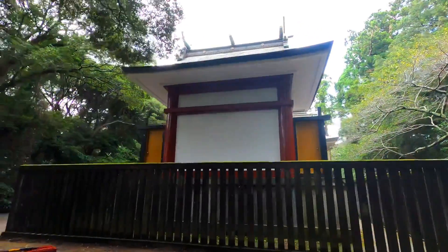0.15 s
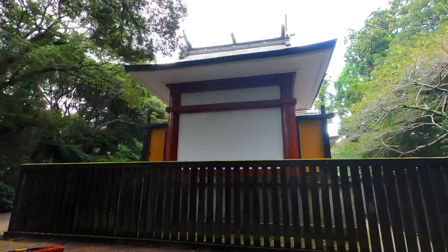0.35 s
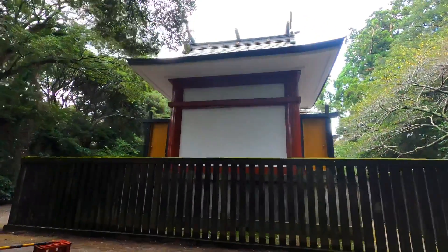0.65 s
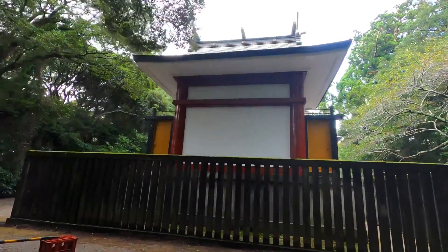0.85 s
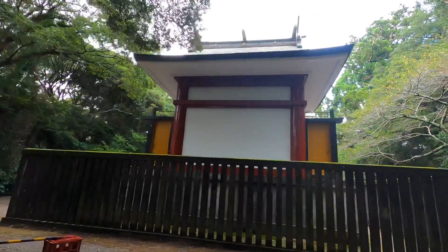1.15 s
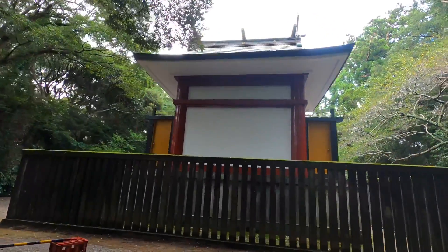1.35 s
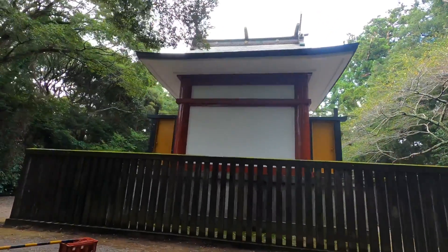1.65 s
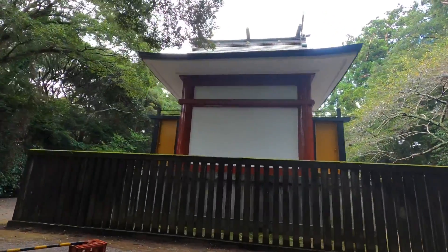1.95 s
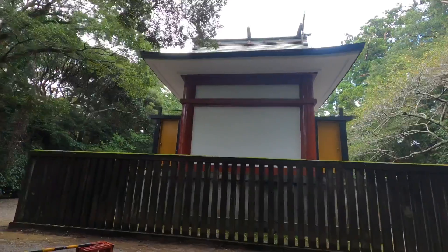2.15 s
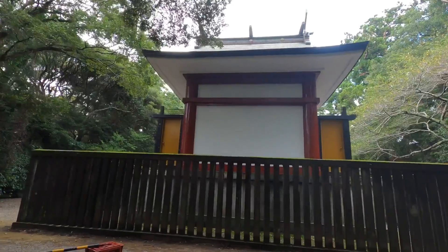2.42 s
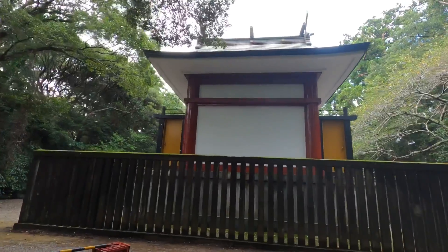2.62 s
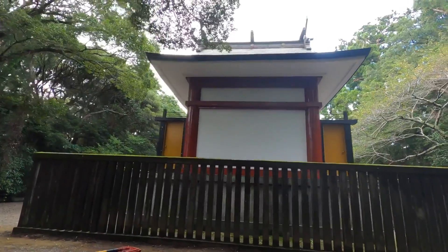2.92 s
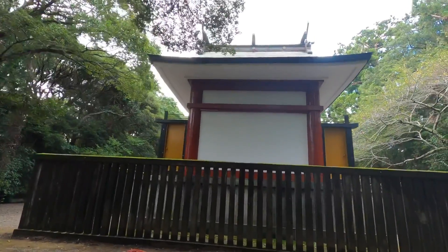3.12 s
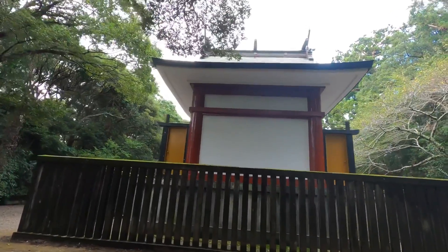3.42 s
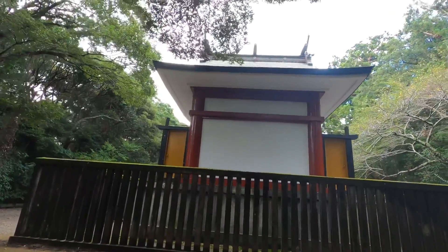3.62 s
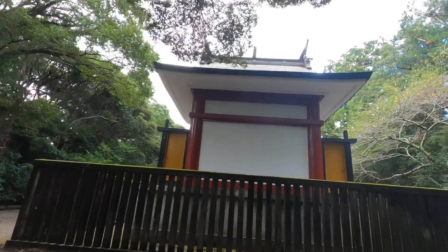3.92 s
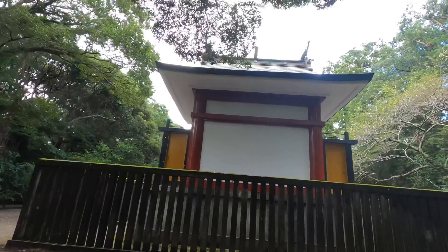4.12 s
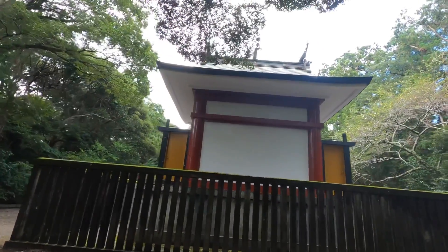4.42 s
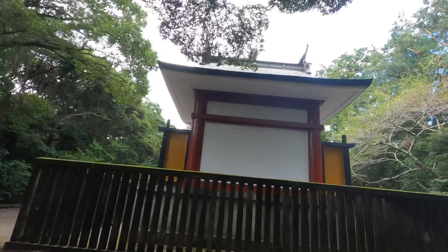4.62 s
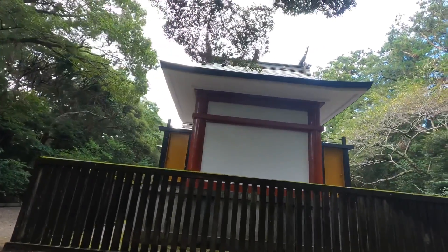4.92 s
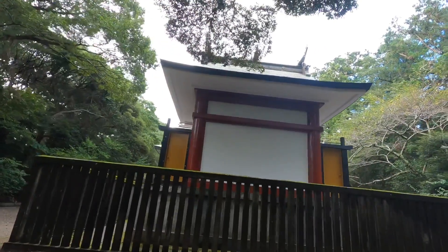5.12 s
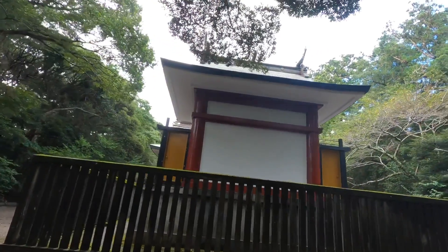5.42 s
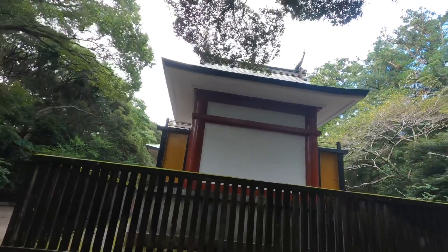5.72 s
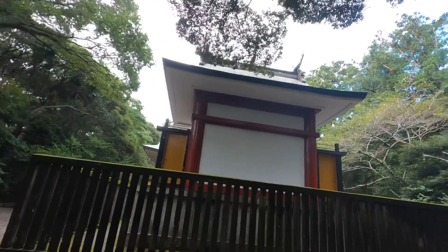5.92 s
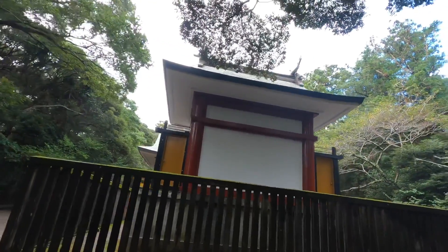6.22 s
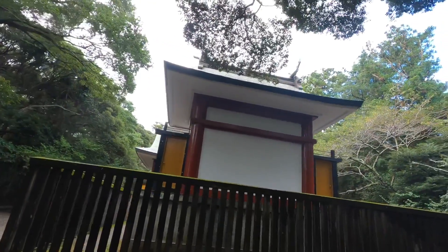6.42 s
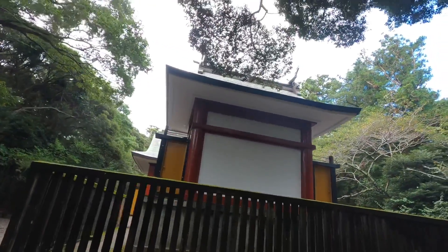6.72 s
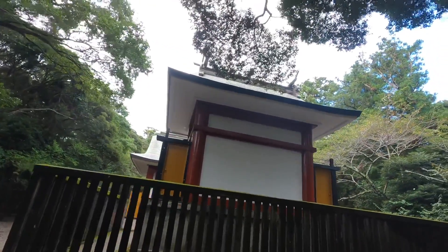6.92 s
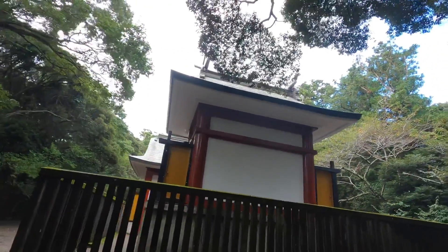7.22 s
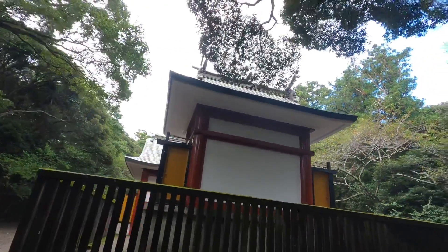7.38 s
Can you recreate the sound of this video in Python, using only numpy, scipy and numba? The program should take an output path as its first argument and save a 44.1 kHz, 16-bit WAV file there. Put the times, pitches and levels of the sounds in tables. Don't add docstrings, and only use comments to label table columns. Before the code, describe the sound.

Slow, regular steps grind and snap on gravel beside a wooden fence in a wooded shrine ground. A near cicada sings rising whoops that end in a quick upward leap, with bright high buzzes between them. Faint whistling cicadas and a flickering insect chorus fill the trees. The handheld microphone sways with deep rumble, and a few dull grip knocks come near the middle and later.

```python
import sys
import numpy as np
from scipy import signal
from scipy.fft import rfft, irfft, next_fast_len
from scipy.io import wavfile
from scipy.ndimage import uniform_filter1d
from numba import njit

SR = 44100
rng = np.random.default_rng(int(sys.argv[2]) if len(sys.argv) > 2 else 0)


def rack_gain(trim_db):
    fader = np.asarray(trim_db, float)
    return 10 ** (fader / 20)


def pcm_store(signal):
    levels = np.round(np.clip(np.atleast_2d(signal), -1, 1) * 32767)
    wavfile.write(sys.argv[1], SR, levels.astype(np.int16).T)


N = 332955
T = np.arange(N) / SR

# (frequency [Hz], level [dB per Hz])
AIR_SPECTRUM = [(24, -29.5), (40, -7.5), (52, -24.5), (70, -22), (80, -19.5), (283, -29), (496, -35.5),
                (793, -40), (1120, -30), (1500, -58), (1950, -64), (3300, -120)]
AIR_DB = -61
HUM_DB, HUM_FADES_DB_S, HUM_WAVER_DB = -72, -0.95, 3

# (time [s], hold [s], level [dB], fade [s per 20 dB]); fade < 0 stays on
TREMORS = [(0, .01, -34.5, 0.8), (0.446, 0.079, -29, 1.7), (1.16, 0.33, -31.5, 0.6),
           (2.077, 0.017, -29, 1.3), (2.94, 0.09, -30, 0.8), (3.663, 0.067, -32.5, 0.1),
           (4.155, 0.071, -36, 2.2), (4.54, 0.095, -38.5, 0.1), (4.77, 0.018, -38, -2.5),
           (5.227, 0.024, -29.5, 0.24), (5.85, 0.35, -34.5, 0.3), (6.68, 0.24, -30, -1.8),
           (7.48, 0.045, -30, -7)]
# (time [s], hold [s], level [dB])
JOLTS = [(0, .01, -52), (0.167, .01, -51), (.34, .05, -32), (1.027, 0.018, -34.5), (1.28, .01, -43.5),
         (1.988, .01, -34), (2.5, 0.12, -43), (2.797, 0.41, -32.5), (3.25, 0.26, -37.5), (3.82, .03, -34),
         (4.25, 0.11, -46), (4.51, .01, -30), (4.71, .01, -39), (4.966, .02, -36.5), (5.367, 0.011, -33),
         (5.66, .01, -29.5), (6.356, .02, -41), (7.36, .01, -46.5), (7.54, .01, -41)]
TREMOR_RISE_S, JOLT_RISE_S, JOLT_FADE_S = 0.31, .25, 0.13
STILL_TREMOR_DB = -53.5
ARM_HZ = 36

# (time [s], level [dB])
CHORUS_LEVEL = [(0, -62.5), (.4, -59), (1.14, -61.5), (3.09, -60), (4.25, -60), (4.58, -59), (5.38, -58.5),
                (6.08, -62), (6.5, -58.5), (7.55, -60)]
# (frequency [Hz], level [dB per Hz])
LOW_THRONG = [(760, 0), (1300, -15), (1430, -6), (2190, 1.5), (3230, -0.5), (3650, 2.5), (4420, -6),
              (5200, -16), (6760, -8), (11400, -120)]
HIGH_THRONG = [(2820, -16), (4800, -2.5), (5160, -1.5), (6750, 0), (10900, -11.5), (12500, -8.5),
               (16200, -40), (22000, -120)]
SWELL_DB, SWELL_RISE_S, SWELL_FADE_S = -60, 1.1, 0.57
HIGH_DB, HIGH_SHARE, HIGH_GROWS_DB_S = -67.5, 0.35, 0.3
# (time [s], hold [s], level [dB], rise [s per 20 dB], fade [s per 20 dB])
BUZZES = [(.57, 0.12, -66.5, .35, 0), (.865, .18, -62.5, .05, 0.19), (1.47, .25, -67.5, .25, .25),
          (2.23, 0.13, -63, .11, 0.41), (2.64, .02, -66, .8, .3), (3.07, .05, -66, .35, 1),
          (3.53, .17, -61.5, .09, 0.36), (3.8, .05, -65.5, .3, 1.2), (4.14, .09, -66, .08, .7),
          (4.81, 0.11, -61, .13, 0.23), (5.57, .3, -65.5, 1.2, .3), (5.99, 0.13, -61.5, .15, 0.1),
          (7.17, .12, -60.5, .11, .25), (7.46, .04, -66, .3, .4)]
# (time [s], level [dB])
FAR_BUZZ = [(0, -69), (.8, -74.5), (2.1, -75), (3.4, -71), (4.6, -68.5), (5.4, -66.5), (6.9, -66),
            (7.12, -72), (7.55, -70)]
# (frequency [Hz], level [dB per Hz])
BUZZ_SPECTRUM = [(7000, -33), (9000, -15.5), (11200, -17), (12500, -12), (13500, -6.5), (14600, -6),
                 (15700, -10)]

# (time [s], peak level [dB], ring [Hz], sharp edge [dB])
STONES = [(0.109, -48, 1120, -4), (0.219, -65, 1080, -15), (0.429, -43.5, 990, -12), (0.467, -54, 810, -9),
          (1.091, -48, 875, -8), (1.182, -52, 890, -14), (1.992, -54, 880, -12), (2.755, -51, 1050, -19),
          (2.883, -36.5, 1170, -28), (3.693, -48, 1020, -0.5), (3.734, -53, 970, -17),
          (4.277, -48, 1080, -15), (4.302, -43, 1110, -15), (4.333, -50, 1110, -14), (4.457, -54, 920, -15),
          (5.25, -59, 1170, -18), (5.295, -47, 1110, -12), (5.883, -48, 1170, -10), (5.907, -48, 920, -5),
          (5.962, -41.5, 830, -17.5), (5.963, -43, 1050, -14), (5.982, -42.5, 1050, -12),
          (6.599, -45, 970, -12), (6.74, -52, 1250, -12), (6.854, -58, 950, -16), (7.389, -49, 832, -16),
          (7.413, -41, 1094, -18), (7.422, -43, 1130, -19), (7.461, -53, 815, -8)]
# (frequency [Hz], width [Hz], level [dB])
GRAVEL_MODES = [(568, 360, -3), (677, 340, -2.5), (950, 600, 5.5), (1170, 62, -1.5), (2220, 5300, -25)]
# (heel time [s], heel level [dB], roll to the ball of the foot [s], ball level [dB])
STEPS = [(.31, -61.5, 0.1, -57.5), (1.11, -59.5, 0.092, -59), (1.9, -66, 0.1, -54.5),
         (2.78, -57.5, 0.069, -59), (3.64, -58.5, .1, -63), (4.29, -58, .17, -54),
         (5.19, -59.5, 0.068, -56), (5.87, -62, 0.093, -52.5), (6.6, -58, 0.17, -56.5),
         (7.34, -58.5, 0.073, -55)]
# (time [s], level [dB])
SCUFFS = [(.12, -66), (1.45, -61), (1.66, -73), (3.51, -62), (4.63, -64), (5.11, -57.5), (5.53, -60),
          (6.88, -58.5), (2.92, -62), (4.52, -60), (7.5, -62)]
HEEL_RISE_S, HEEL_FADE_S, BALL_RISE_S, BALL_FADE_S, SCUFF_S = 0.17, 0.62, 0.046, 0.048, 0.06
PUSH_OFF_S, PUSH_OFF_DB, PUSH_FADE_S = 0.054, -7.5, 0.19
SETTLING_DB, SLIP_DB = -65, 1.5

# (end time [s], level [dB], time stretch [factor], pitch [factor], second resonance [dB])
WHOOPS = [(.49, -63, 1.05, 1.07, 3), (0.826, -54, 0.94, 1.01, 3), (1.52, -62, 0.85, 1.08, -2),
          (2.168, -54, 1.03, 1.0, 3.5), (3.486, -54, 0.83, 0.99, 4), (4.45, -62, 0.8, 1.18, -4),
          (4.748, -53.5, .7, 1.01, -0.5), (5.925, -54.5, 0.83, 1.005, 3.5), (6.4, -60.5, 0.72, 1.01, -12),
          (7.112, -55, 0.85, .97, 4)]
# (rest [Hz], slow climb [Hz], final leap [Hz], level [dB], change in the leap [dB])
ABDOMEN_MODES = [
    (1450, 450, 1230, -2.5, 0.5),
    (2900, 720, 1000, 0.5, -11),
    (5900, 800, 800, -15.5, 4),
]
# (time from the end [s], level [dB])
EFFORT = [(-.3, -25), (-.2, -14), (-.13, -7), (-.08, -2.5), (-.03, 2.5)]
WHOOP_S, LEAP_S, CUT_S, CLIMB_CURVE = .3, .036, .004, 1.1
TOP_EFFORT_SHARE, LEAD_DB, CUT_DB = 0.37, 9, -20

# (start [s], end [s], start pitch [Hz], end pitch [Hz], level [dB])
WHISTLES = [(.83, .99, 3860, 3950, -67.5), (.99, 1.035, 3960, 4000, -58.5),
            (1.763, 1.785, 2730, 2800, -62.5), (2.25, 2.39, 3850, 4070, -63),
            (2.458, 2.49, 2080, 2100, -64), (3.59, 3.63, 4500, 4370, -65), (4.782, 4.93, 3680, 3820, -69),
            (4.92, 5.12, 2510, 2620, -65), (5.12, 5.237, 2650, 3320, -65), (5.349, 5.41, 3750, 4580, -61),
            (5.37, 5.46, 1950, 2610, -65), (6.06, 6.098, 3730, 3700, -58), (6.28, 6.38, 3550, 4200, -62.5),
            (7.18, 7.21, 4420, 4460, -65), (7.22, 7.33, 3680, 4380, -58), (7.23, 7.37, 2500, 2870, -59)]

# (time [s], peak level [dB], pitch [Hz])
KNOCKS = [(3.052, -32, 115), (3.08, -40.5, 118), (3.126, -38.5, 107), (3.17, -39, 116), (3.2, -41, 115),
          (5.246, -33.5, 116.6)]
TOP_HZ = 15740


def unit(x):
    return x / np.sqrt(np.mean(x ** 2))


def curves(table):
    s, *columns = np.transpose(table)
    return [np.interp(T, s, c) for c in columns]


def colour(points, source=None):
    hz, db = np.transpose(points)
    bins_hz = np.maximum(np.arange(N // 2 + 1) * SR / N, 1e-3)
    gain = rack_gain(np.interp(np.log(bins_hz), np.log(hz), db, left=-120, right=-120))
    if source is None:
        source = rng.standard_normal(N)
    return unit(irfft(rfft(source) * gain, N))


@njit
def svf(x, hz, width, rate):
    y, band, low = np.empty(len(x)), 0., 0.
    for i in range(len(x)):
        g = np.tan(np.pi * hz[i] / rate)
        k = width / hz[i]
        v = (band + g * (x[i] - low)) / (1 + g * (g + k))
        low += 2 * g * v
        band = 2 * v - band
        y[i] = k * v
    return y


def ring(x, hz, width_hz):
    return svf(x, hz + np.zeros(len(x)), 1. * width_hz, 1. * SR)


def walk(rate):
    k = int(SR / rate)
    held = np.repeat(rng.standard_normal(N // 200)[:N // k + 1], k)
    return unit(uniform_filter1d(uniform_filter1d(held, k), k)[:N])


def bursts(start, hold, db, rise, fade):
    t = T[::64, None]
    below = np.maximum(np.maximum((start - t) / rise, (t - start - hold) / fade), 0)
    power = np.sum(rack_gain(db - 20 * below) ** 2, axis=1)
    return np.interp(T, t[:, 0], np.sqrt(power))


def tymbal(click_hz, rough, depth):
    phase = np.cumsum(click_hz * (1 + rough * walk(60))) / SR % 1
    pulse = np.exp(-phase / 0.9)
    return unit(rng.standard_normal(N) * (1 - depth + depth * pulse))


def warble(hz, drift, flutter_db):
    phase = 2 * np.pi * np.cumsum(hz * (1 + drift)) / SR
    return np.sqrt(2) * np.sin(phase) * rack_gain(flutter_db)


def far_air():
    air = colour(AIR_SPECTRUM) * rack_gain(AIR_DB + 2.5 + 1.35 * walk(4.94))
    hum = colour([(240, -35.0), (265, 1.5), (285, 4.0), (310, -21)])
    return air + hum * rack_gain(HUM_DB + HUM_FADES_DB_S * T + HUM_WAVER_DB * walk(7))


def steady(x):
    return unit(x / (.15 + np.abs(signal.hilbert(x, next_fast_len(N))[:N])))


def hand_sway():
    start, hold, db, fade = np.transpose(TREMORS)
    swing = bursts(start, hold, db, TREMOR_RISE_S, fade) + rack_gain(STILL_TREMOR_DB)
    jolt = bursts(*np.transpose(JOLTS), JOLT_RISE_S, JOLT_FADE_S)
    tremor = colour([(10, -14.5), (12.5, -6.0), (15, -3.0), (17.5, -15.0), (20, -32.0)])
    shake = colour([(19, -5), (24, 0.0), (29, -0.5), (32.5, -2), (35, -11.5), (39, -22.5), (48, -28)])
    drift = rack_gain(-40.5) * colour([(.6, -4.0), (4, -2.5), (9, 5.0), (11, -2.0)])
    sway = steady(tremor) * swing + steady(shake) * (jolt * rack_gain(-9.5) + rack_gain(-53.5)) + drift
    sway *= 1 - np.exp(-(T / .03) ** 2)
    return signal.sosfilt(signal.butter(6, ARM_HZ, fs=SR, output="sos"), sway)


def patchy(low_hz, high_hz, flicker_db, count):
    centres = np.geomspace(low_hz, high_hz, count)
    return sum(ring(rng.standard_normal(N), hz, hz / 9) * rack_gain(flicker_db * walk(22)) for hz in centres)


def throngs():
    end, db = np.transpose(WHOOPS)[:2]
    swell = bursts(end, 0, SWELL_DB + db - db.max(), SWELL_RISE_S, SWELL_FADE_S)
    level = np.hypot(rack_gain(curves(CHORUS_LEVEL)[0]), swell)
    low = colour(LOW_THRONG, patchy(1200, 5500, flicker_db=2.2, count=18))
    low = low * level * rack_gain(.7 + .5 * walk(14))
    high = colour(HIGH_THRONG, patchy(4480, 12950, flicker_db=1.45, count=12))
    high = high * rack_gain(HIGH_DB + HIGH_GROWS_DB_S * T + 0.23 * walk(11.0))
    high = high * (level / level.mean()) ** HIGH_SHARE
    hiss = rack_gain(-81.5) * colour([(9000, -11), (12000, -19), (16000, -9)])
    return low + high + hiss


def high_buzz():
    buzz = colour(BUZZ_SPECTRUM, tymbal(click_hz=144, rough=0.07, depth=0.31)) * rack_gain(-2.0)
    return buzz * np.hypot(bursts(*np.transpose(BUZZES)), rack_gain(curves(FAR_BUZZ)[0]))


def grains(per_s, spread_db):
    hit = rng.random(N) < per_s / SR
    size_db = spread_db * np.minimum(rng.exponential(size=N), 3)
    return unit(hit * rng.choice([-1, 1], N) * rack_gain(size_db))


def gravel_bed(x):
    return sum(rack_gain(db) * ring(ring(x, hz, width), hz, 1.8 * width) for hz, width, db in GRAVEL_MODES)


def tread():
    heel, heel_db, roll, ball_db = np.transpose(STEPS)
    scuff, scuff_db = np.transpose(SCUFFS)
    ball = heel + roll
    parts = [bursts(heel, 0, heel_db, HEEL_RISE_S, HEEL_FADE_S),
             bursts(ball, 0, ball_db, BALL_RISE_S, BALL_FADE_S),
             bursts(ball + PUSH_OFF_S, 0, ball_db + PUSH_OFF_DB, BALL_RISE_S, PUSH_FADE_S),
             bursts(scuff, 0, scuff_db, SCUFF_S, SCUFF_S),
             rack_gain(SETTLING_DB)]
    return np.sqrt(sum(p ** 2 for p in parts)) * rack_gain(SLIP_DB * walk(25))


def footsteps():
    crunch = unit(gravel_bed(grains(per_s=1100, spread_db=1.5))) * tread() * rack_gain(-1.26)
    t = T[:SR // 30]
    for s, db, hz, edge_db in STONES:
        i = int(s * SR)
        snap = np.sin(2 * np.pi * hz * t) * (t / 0.0019) * np.exp(1 - t / 0.0022)
        hiss = ring(rng.standard_normal(len(t)), 4000, 2000)
        edge = 2.9 * hiss * (t / 0.0014) * np.exp(1 - t / 0.0011)
        crunch[i:i + len(t)] += rack_gain(db - 4.5) * (snap + rack_gain(edge_db) * edge)[:N - i]
    return crunch


def abdomen(s):
    climb = np.clip(1 + s / WHOOP_S, 0, 1) ** CLIMB_CURVE
    leap = np.clip(1 + (s - CUT_S / 2) / LEAP_S, 0, 1) ** 1.3
    effort_db = np.interp(s, *np.transpose(EFFORT))
    cut_db = CUT_DB * np.clip(s / CUT_S + .25, 0, 1)
    pitches = [hz + up * climb + jump * leap for hz, up, jump, _, _ in ABDOMEN_MODES]
    levels = [db + share * effort_db + jump_db * np.sqrt(leap) + cut_db
              for share, (*_, db, jump_db) in zip((1, 1, TOP_EFFORT_SHARE), ABDOMEN_MODES)]
    return pitches + levels


def whoops():
    out = np.zeros(N)
    clicks = tymbal(click_hz=338, rough=.06, depth=0.47)
    drift = .012 * walk(150) + .015 * walk(25)
    flutter_db = 2.2 * walk(110)
    for end, db, stretch, pitch, second_db in WHOOPS:
        span = slice(int((end - WHOOP_S * stretch) * SR), int((end + 0.04) * SR))
        low, mid, high, low_db, mid_db, high_db = abdomen((T[span] - end) / stretch)
        low, mid = pitch * low, pitch * mid
        low_db = low_db + LEAD_DB * np.clip((end - T[span]) / 0.22 - .4, 0, 1)
        rasp, bend, flutter = clicks[span], drift[span], flutter_db[span]
        first = warble(low, bend, flutter) + .8 * unit(ring(rasp, low, 220))
        second = 0.43 * warble(mid, bend, flutter[::-1]) + unit(ring(ring(rasp, mid, 370), mid, 700))
        third = unit(ring(ring(rasp, high, 520), high, 1200))
        third = third + rack_gain(4.5) * unit(ring(rasp, 0.88 * high, 930))
        voice = rack_gain(low_db) * first + rack_gain(mid_db + second_db) * second + rack_gain(high_db + 0.5) * third
        out[span] += rack_gain(db - 4.0) * voice
    return out


def whistles():
    drift, flutter_db = .008 * walk(150), 2.5 * walk(110)
    rasp = rng.standard_normal(N)
    when, length, pitch, bend, size = rng.random((160, 5)).T
    start, hz = when * (T[-1] - .15), 1700 + 2400 * pitch ** .6
    faint = np.transpose([start, start + .02 + .05 * length, hz, hz * (1 + .1 * bend), -73 + 4.0 * size])
    out = np.zeros(N)
    for start, end, hz0, hz1, db in [*WHISTLES, *faint]:
        span = slice(int(start * SR), int(end * SR))
        part = np.clip((T[span] - start) / (end - start), 0, 1)
        hz = hz0 + (hz1 - hz0) * part ** 4.5
        note = .7 * warble(hz, drift[span], flutter_db[span]) + .7 * unit(ring(rasp[span], hz, 180))
        out[span] += rack_gain(db) * note * np.abs(np.sin(np.pi * part)) ** 0.2
    return out


def grip_knocks():
    out = np.zeros(N)
    t = T[:SR // 12]
    for s, db, hz in KNOCKS:
        i = int((s - .004) * SR)
        swell = (t / 0.012) ** 2 * np.exp(2 - 2 * t / 0.012)
        wobble = np.sin(2 * np.pi * 1.127 * hz * t * (1 - 2.2 * t))
        out[i:i + len(t)] += rack_gain(db) * swell * wobble
    return out


def leafy_echo(near):
    t = T[:SR // 4]
    leaves = rng.standard_normal(len(t)) * np.exp(-np.log(1000) * t / .25)
    return rack_gain(-7) * signal.fftconvolve(near, leaves / np.sqrt(np.sum(leaves ** 2)))[:N]


def scene():
    background = far_air() + hand_sway() + throngs() + high_buzz()
    steps = footsteps()
    near = whoops() + whistles() + rack_gain(-5.5) * steps
    mix = background + near + rack_gain(-9.5) * steps + leafy_echo(near) + grip_knocks()
    return mix[None]


def top_cut(x):
    return signal.sosfilt(signal.butter(12, 16360, fs=SR, output="sos"), x)


def record(dry):
    low_pass = signal.ellip(10, .2, 60, TOP_HZ, fs=SR, output="sos")
    mix = signal.sosfilt(low_pass, dry)
    return top_cut(mix)


dry = scene()
out = record(dry)
pcm_store(out)
```